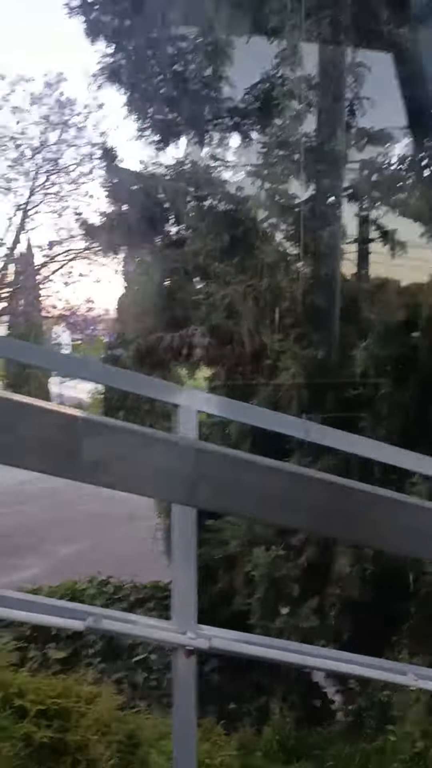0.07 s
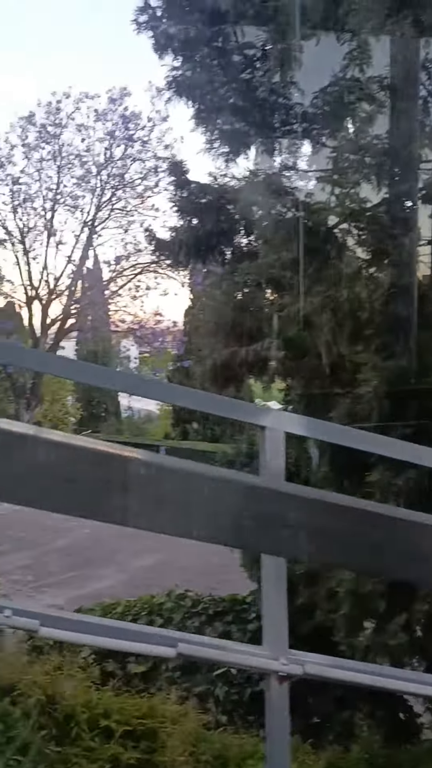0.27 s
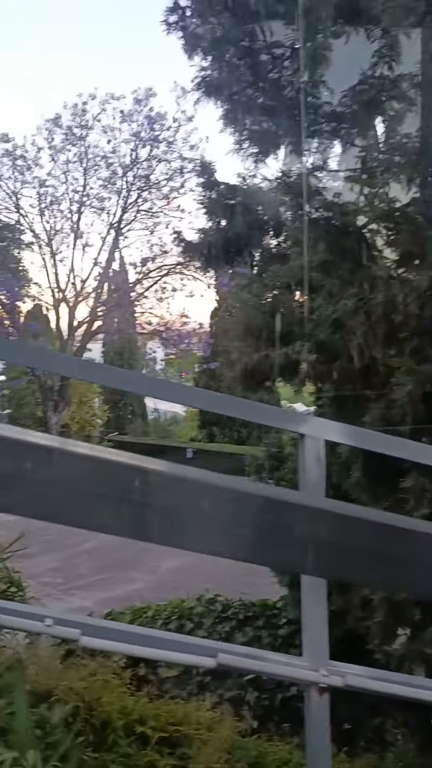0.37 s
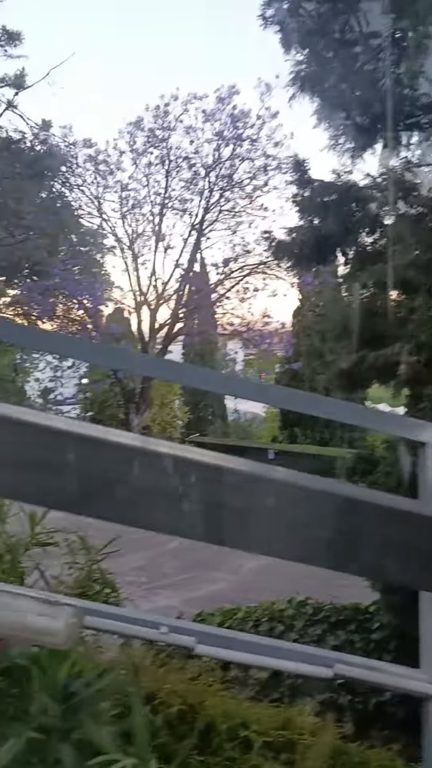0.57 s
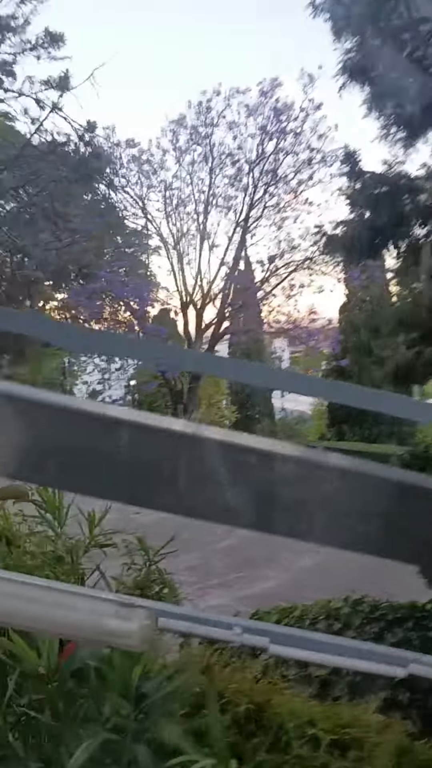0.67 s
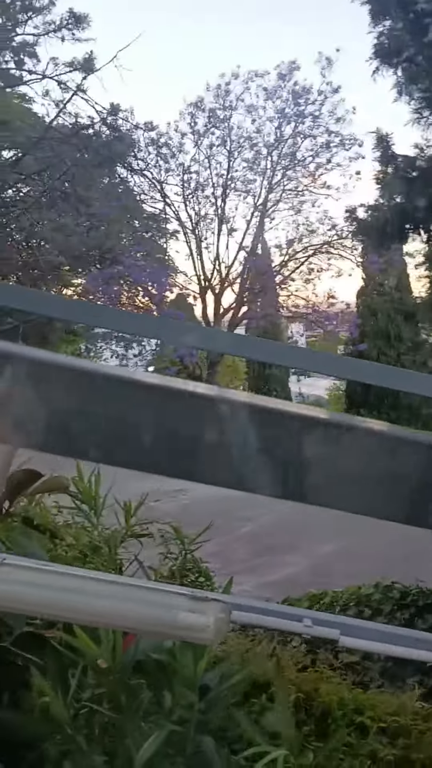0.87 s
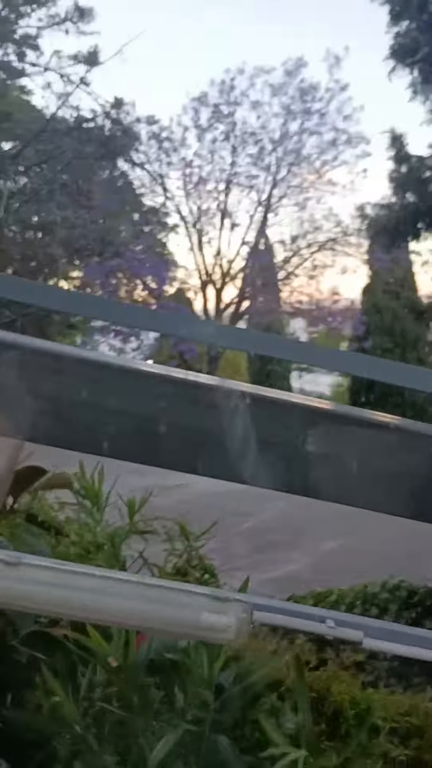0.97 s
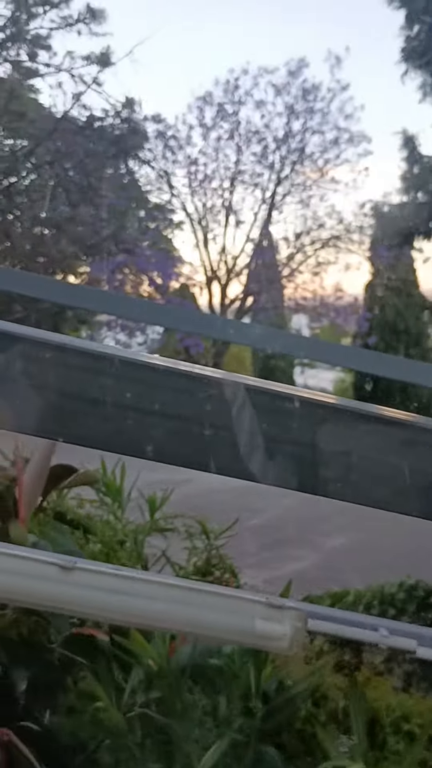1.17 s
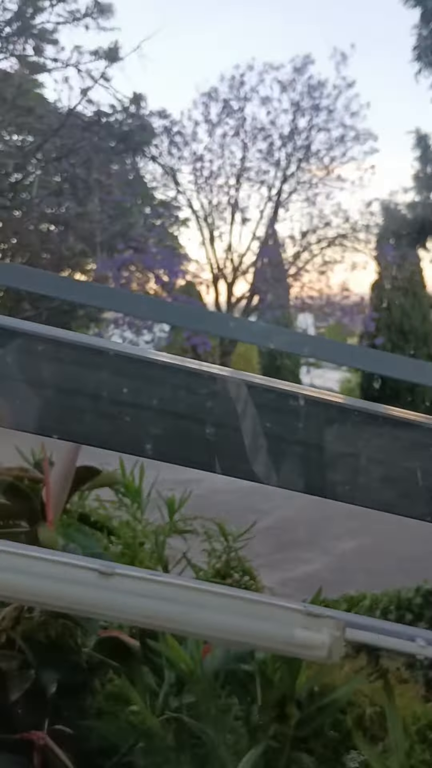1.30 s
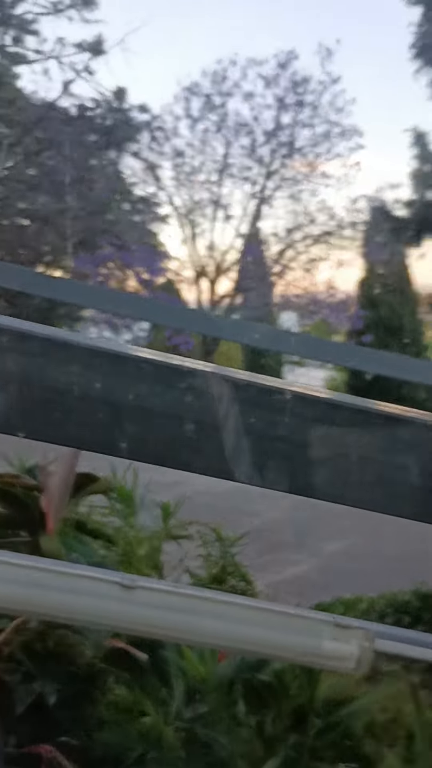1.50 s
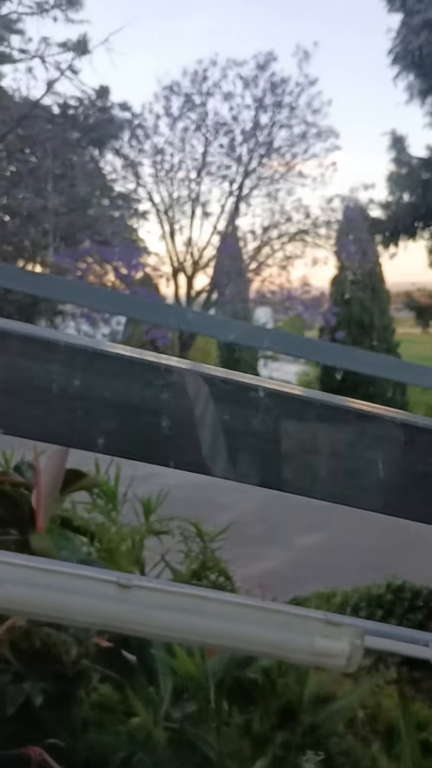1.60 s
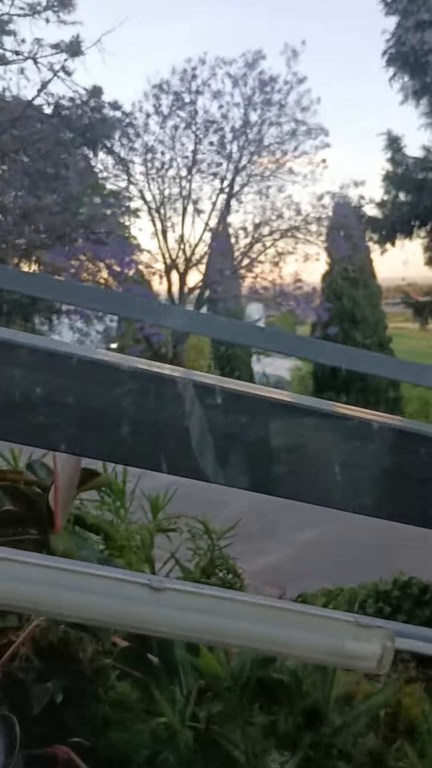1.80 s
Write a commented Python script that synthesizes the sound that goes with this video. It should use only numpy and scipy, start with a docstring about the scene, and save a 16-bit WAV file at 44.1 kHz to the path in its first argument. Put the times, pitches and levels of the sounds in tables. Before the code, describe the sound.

One sharp, bright metal clack with quick chattering rebounds rings briefly in a small hard funicular cabin, followed by scattered light ticks over quiet wheel rumble and thin hiss, picked up close by a handheld microphone inside.

```python
"""Wheels rumble and a thin hiss runs on, from filtered noise, while loose parts of a funicular cabin tick.
The body groans faintly twice, once near the start and once well after a metal fitting slams and chatters:
sliding tones with rough noise. The slam is one sharp clack of close contacts that rings fitting and panel.
Wheel bumps boom as low noise bursts. Each knock is a short crack plus a bright tail of echoes from the
small, hard cabin."""
import sys
import numpy as np
from scipy import signal
from scipy.fft import rfft, irfft, next_fast_len
from scipy.io import wavfile
from scipy.ndimage import uniform_filter1d

SR = 44100
rng = np.random.default_rng(int(sys.argv[2]) if len(sys.argv) > 2 else 0)


def transcribe(signal):
    """Save signal, clipped to [-1, 1], as a 16-bit WAV file at the path in sys.argv[1]."""
    frames = np.atleast_2d(signal).T
    limited = np.clip(frames, -1, 1)
    pcm = np.round(limited * 32767).astype(np.int16)
    wavfile.write(sys.argv[1], SR, pcm)


N = 81585  # length in samples


def undb(db):
    """Turn decibels into an amplitude factor."""
    return 10 ** (np.asarray(db) / 20)


def unit(x):
    """Scale to an energy of 1."""
    return x / np.sqrt(np.sum(x ** 2))


def along(points, hz):
    """Read a value between (Hz, value) points, on a log-frequency axis."""
    point_hz, values = np.array(points, float).T
    return np.interp(np.log(hz + 1), np.log(point_hz), values)


def colour(x, points):
    """Filter to the given (Hz, dB) response; folding the cepstrum forward keeps sound from coming early."""
    n = 2 * next_fast_len(len(x))
    hz = np.arange(n // 2 + 1) * SR / n
    cepstrum = irfft(np.log(undb(along(points, hz))))
    cepstrum[1:n // 2] *= 2
    cepstrum[n // 2 + 1:] = 0
    response = np.exp(rfft(cepstrum))
    return irfft(rfft(x, n) * response)[:len(x)]


def resonate(x, hz, width_hz):
    """One resonance: the narrower it is, the longer it rings."""
    b, a = signal.iirpeak(min(hz, SR / 2 - 1000), hz / width_hz, fs=SR)
    return signal.lfilter(b, a, x)


def noise(points):
    """Steady coloured noise, rms 1."""
    return unit(colour(rng.standard_normal(N), points)) * np.sqrt(N)


def walk(rate):
    """Smooth random wandering with a spread of 1, heading for a new value `rate` times a second."""
    k = int(SR / rate)
    steps = np.repeat(rng.standard_normal(N // k + 1), k)
    smooth = uniform_filter1d(steps, k)[:N]
    return smooth / smooth.std()


def add(out, start, x):
    """Mix x in at a time in seconds."""
    i = int(start * SR)
    out[i:i + len(x)] += x[:N - i]


UNEVEN_DB, UNEVEN_STEP_HZ = 3, 110


def uneven(x):
    """The many weak resonances of a part lift some narrow bands and sink others."""
    hz = np.arange(900, SR / 2, UNEVEN_STEP_HZ)
    db = UNEVEN_DB * np.clip(rng.standard_normal(len(hz)), -2, 1)
    return colour(x, [(700, 0), *zip(hz, db)])


CABIN_BUILD_S = 0.0045  # how gradually the echoes build up
# How long cabin echoes take to fall by 60 dB, before any shortening: f/Hz, t/s
CABIN_ECHO_TIMES = [(300, 0.39), (1200, 0.14), (3500, 0.23), (6000, 0.17), (9000, 0.15)]


def knock(crack_db, crack_s, tail_share=1):
    """A brief crack and the dense echoes of the cabin, each band dying at its own rate."""
    t = np.arange(SR // 2) / SR
    crack, echoes = rng.standard_normal((2, len(t)))
    spectrum = rfft(echoes)
    # half-octave bands, numbered
    band = np.round(2 * np.log2(np.arange(len(spectrum)) * SR / len(t) + 100))
    tail = np.zeros(len(t))
    for b in np.unique(band):
        t60 = tail_share * along(CABIN_ECHO_TIMES, 2 ** (b / 2))
        tail += irfft(spectrum * (band == b), len(t)) * np.exp(-np.log(1000) * t / t60)
    tail = unit(tail * (1 - np.exp(-t / CABIN_BUILD_S)))
    return tail + undb(crack_db) * unit(crack * np.exp(-t / crack_s))


# crack over the tail, and its fade time, for the clack and the jiggle
CRACK_DB, CRACK_S = -1.5, 0.0026
TICK_TAIL_SHARE = 0.74  # loose parts get echoes of this share of the full length
JIGGLE_DB, JIGGLE_PER_S = -7, 35  # level against the hiss, mean contacts a second
HISS_FLICKER_DB = 1.5  # spread of the flicker
# Colour of the hiss and the jiggling trim: f/Hz, level/dB
HISS_COLOUR = [(200, -15.5), (600, 2.5), (1200, 3.5), (2500, 1.5), (6300, 3), (8000, -8.5), (10000, -21),
               (13000, -24.5), (15500, -16)]


def jiggle():
    """Fine chance contacts of loose trim, rms 1."""
    contacts = (rng.random(N) < JIGGLE_PER_S / SR) * rng.random(N)
    knocks = signal.fftconvolve(contacts, knock(CRACK_DB, CRACK_S, TICK_TAIL_SHARE))[:N]
    return np.sqrt(N) * unit(colour(knocks, HISS_COLOUR))


# Colour of the wheel rumble: f/Hz, level/dB
RUMBLE_COLOUR = [(45, -20), (68, 0), (110, 1), (160, 1.5), (240, -6.5), (420, -8.5), (700, -21),
                 (1500, -23.5), (5000, -57)]
# How loud the running noise is over time: t/s, rumble level/dB, hiss level/dB
RUNNING_LEVELS = [(0, -59, -63.5), (0.182, -67.5, -69), (0.45, -63, -70), (0.68, -66, -63.5),
                  (0.799, -67, -69), (1.12, -60.5, -66.5), (1.42, -61.5, -64.5), (1.57, -64.5, -66.5),
                  (1.68, -61, -63.5), (1.85, -63.5, -69.5)]


def running():
    """Wheel rumble and a flickering rolling hiss; the jiggling trim follows the hiss level over time."""
    t = np.arange(N) / SR
    times, rumble_db, hiss_db = np.array(RUNNING_LEVELS).T
    rumble = undb(np.interp(t, times, rumble_db)) * noise(RUMBLE_COLOUR)
    flicker = undb(HISS_FLICKER_DB * walk(49.95))
    rolling = flicker * noise(HISS_COLOUR) + undb(JIGGLE_DB) * jiggle()
    return rumble + undb(np.interp(t, times, hiss_db)) * rolling


TICK_DB, TICK_CRACK_S = 0.5, 0.0028  # added to every tick's level; fade time of its crack
TICK_WIDTH_HZ, TICK_MODE_STEP_DB = 224, -2.25  # each next resonance is weaker by this step
SHEEN_HZ, SHEEN_WIDTH_HZ = 15700, 2400
# Colour of the broad click: f/Hz, level/dB
TICK_COLOUR = [(200, -2.5), (700, -18), (1200, -0.5), (2200, -2.5), (4000, 5), (6200, 6.5), (8000, -12),
               (10000, -25.5), (15000, -45.5)]
# Knocks of loose parts: t/s, level/dB, crack level over the tail/dB, click level against the
# resonances/dB, top-end sheen level/dB, resonances f/Hz (strongest first)
LOOSE_PARTS = [(0.0090, -28, -2, -26, -32, (970, 2200)),
               (0.0367, -19.5, -2.5, -4, -19, (6530, 7930, 9260, 1740)),
               (0.0497, -17, -8, -34, -25, (6450, 7100, 3070, 3530, 1800)),
               (0.1316, -32, 2, 2, -32, (4700,)), (0.2094, -18.5, -25, -3, -19, (2900,)),
               (0.4339, -14, -3, -3, -36, (5930, 5000, 2730, 3790, 1620, 1980, 1280)),
               (0.4971, -25.5, -5, 14, -38, (4000, 2800)),
               (0.5418, -23, -2, -3, -48, (7020, 3950, 7040, 2770)), (0.596, -25.5, -4, -2, -28, (6700,)),
               (0.606, -19.5, -12, 1, -26, (4730, 6350, 4770, 2180)),
               (0.693, -18.5, -2.5, -4.5, -15, (5790, 5100, 2100, 6870, 4170)),
               (0.725, -22.5, -3, 5.5, -24, (1970, 5000, 3430)), (0.8282, -29, -3, 14, -19, (5500,)),
               (0.8626, -17, -9, -22, -52, (4175, 4820, 4460, 3920, 2270)),
               (0.88, -27.5, 5, -5.5, -37, (4500,)), (1.3785, -27, -0.5, 4, -26, (6900, 1090)),
               (1.4830, -28, 4, 2.5, -34, (3570, 1080)), (1.5150, -31.5, -4, 7, -32, (4260,)),
               (1.609, -22.5, -5, 1.5, -34, (5800, 4700)), (1.6701, -24.5, -2.5, 1, -18, (5600, 1650)),
               (1.7374, -15, 1, -4, -41, (4840, 3740, 4640, 6150, 7760, 9120)),
               (1.764, -26.5, -15, 2, -34, (1650,)), (1.8303, -34, -13, 8, -10, (8800,))]


def ticks():
    """Each loose part gives a broad click and a few resonances of its own; the microphone adds a sheen."""
    out = np.zeros(N)
    for start, db, crack_db, click_db, sheen_db, resonances in LOOSE_PARTS:
        hit = knock(crack_db, TICK_CRACK_S, TICK_TAIL_SHARE)
        click = unit(colour(uneven(hit), TICK_COLOUR))
        ring = np.zeros(len(hit))
        for k, hz in enumerate(resonances):
            narrow = resonate(hit, hz, TICK_WIDTH_HZ)
            ring += undb(k * TICK_MODE_STEP_DB) * unit(resonate(narrow, hz, 4 * TICK_WIDTH_HZ))
        body = unit(unit(ring) + undb(click_db) * click)
        sheen = resonate(hit, SHEEN_HZ, SHEEN_WIDTH_HZ)
        sheen = unit(resonate(sheen, SHEEN_HZ, SHEEN_WIDTH_HZ))
        add(out, start, undb(TICK_DB + db) * (body + undb(sheen_db) * sheen))
    return out


GROAN_SETTLE_S, GROAN_ATTACK_S, GROAN_RELEASE_S = 0.0183, 0.019, 0.059
GROAN_ROUGH_DB = -4  # rubbing noise against the tone
GROAN_UPPER, GROAN_UPPER_DB = 1.1, -20  # upper mode: pitch ratio and level
# Groans of the body: t/s, length t/s (before half a release is added), start f/Hz, settled f/Hz, level/dB
GROANS = [(0.009, 0.12, 418, 327, -54), (1.061, 0.093, 383.4, 445.4, -56)]


def groans():
    """Short rubbing tones of the cabin body that slide and settle, with a weaker upper mode."""
    out = np.zeros(N)
    for start, length, from_hz, to_hz, db in GROANS:
        t = np.arange(int((length + GROAN_RELEASE_S / 2) * SR)) / SR
        pitch_hz = to_hz + (from_hz - to_hz) * np.exp(-t / GROAN_SETTLE_S)
        phase = 2 * np.pi * np.cumsum(pitch_hz) / SR
        tone = np.sqrt(2) * (np.sin(phase) + undb(GROAN_UPPER_DB) * np.sin(GROAN_UPPER * phase))
        rub = resonate(resonate(rng.standard_normal(N), to_hz, 210), to_hz, 210)
        rub = unit(rub)[:len(t)] * np.sqrt(N)
        fade_in = np.minimum(t / GROAN_ATTACK_S, 1)
        fade_out = np.minimum((t[-1] - t) / GROAN_RELEASE_S, 1)
        add(out, start, undb(db) * fade_in * fade_out * (tone + undb(GROAN_ROUGH_DB) * rub))
    return out


CONTACT_HZ = 19000  # brightness limit of a 0 dB contact


def soften(x, db):
    """A lighter contact lasts longer and so is duller: a low-pass that drops with level."""
    cutoff_hz = min(CONTACT_HZ * undb(db / 2), SR / 2 - 1000)
    return signal.lfilter(*signal.butter(2, cutoff_hz, fs=SR), x)


def fed(blows, t60):
    """Amplitude of a ring whose energy is fed by blows and leaks away."""
    keep = np.exp(-2 * np.log(1000) / (t60 * SR))
    return np.sqrt(signal.lfilter([1], [1, -keep], blows))


RING_WAVER_RAD = 0.6  # spread of the phase waver


def mode(hz):
    """One wavering partial; its pitch may move."""
    turns = np.cumsum(hz * np.ones(N)) / SR + rng.random()
    return np.sin(2 * np.pi * turns + RING_WAVER_RAD * walk(62.4))


CLACK_DB = 11  # lifts the whole clack
RATTLE_DB, RATTLE_PER_S = 1.5, 350  # spread and rate of the rattle's level
RING_DB, RING_T60_S, RING_BUILD_S = -7.5, .23, 0.01  # fitting's level against the rattle; decay; build-up
PANEL_DB, PANEL_T60_S, PANEL_SAG_HZ_PER_S = -19.5, .26, 160.5  # panel's level, decay and falling pitch
# Contacts of the clack: t/s, level/dB (against one another)
CONTACTS = [(0.2213, 1), (0.224, 1), (0.2346, -5.5), (0.246, -6), (0.2551, -4), (0.262, -11.5),
            (0.2686, -11), (0.278, -11.5)]
# Colour of the clack: f/Hz, level/dB
CLACK_COLOUR = [(150, -45.5), (450, -39.5), (560, -16.5), (700, -19.5), (830, -18.5), (1100, -18),
                (1900, -10), (2250, -15), (2700, -8.5), (4000, -6.5), (5700, 0.5), (7400, -7.5),
                (9000, -19), (13000, -32.5), (15500, -18)]
# Modes of the fitting, whose levels follow the colour of the clack: f/Hz
FITTING_MODES = [1852, 2449, 2740, 3233, 3345, 3569, 3945, 4071, 4480, 4610, 4885, 4991, 5221, 5935, 6027,
                 6506]
# Modes of the panel that holds the fitting: f/Hz (before it sags), level/dB (against one another)
PANEL_MODES = [(545, -4.5), (606, 0), (680, -7.5)]


def clack():
    """The fitting hits, rebounds and chatters; contacts feed its modes and the sagging, beating panel."""
    knocks, blows, t = np.zeros(N), np.zeros(N), np.arange(N) / SR
    for start, db in CONTACTS:
        add(knocks, start, undb(db) * soften(knock(CRACK_DB, CRACK_S), db))
        # energy goes with amplitude squared
        add(blows, start, undb(db) ** 2 * signal.windows.hann(int(RING_BUILD_S * SR)))
    rattle = colour(uneven(knocks * undb(RATTLE_DB * walk(RATTLE_PER_S))), CLACK_COLOUR)
    partials = sum(undb(along(CLACK_COLOUR, hz)) * mode(hz) for hz in FITTING_MODES)
    ring = fed(blows, RING_T60_S) * partials
    sag_hz = PANEL_SAG_HZ_PER_S * np.maximum(t - CONTACTS[0][0], 0)
    panel_partials = sum(undb(db) * mode(hz - sag_hz) for hz, db in PANEL_MODES)
    # light later contacts count for more in the panel than in the fitting, so its ring is kept up longer
    panel = fed(np.sqrt(blows), PANEL_T60_S) * panel_partials
    return undb(CLACK_DB) * (unit(rattle) + undb(RING_DB) * unit(ring) + undb(PANEL_DB) * unit(panel))


# Wheel bumps through the floor: t/s, length t/s, f/Hz, level/dB
WHEEL_BUMPS = [(0.403, 0.051, 200, -55), (0.826, 0.041, 298, -63.5), (1.433, 0.042, 139.6, -55),
               (1.606, 0.052, 134, -54.5), (1.646, 0.04, 336, -66), (1.730, 0.067, 126, -59),
               (1.822, 0.045, 143, -58)]


def bumps():
    """Uneven rail makes the floor boom for a few cycles: short bursts of low, narrow noise."""
    out = np.zeros(N)
    for start, length, hz, db in WHEEL_BUMPS:
        n = int(length * SR)
        boom = resonate(resonate(rng.standard_normal(N), hz, hz / 2), hz, hz / 2)[-n:]
        burst = unit(boom * signal.windows.tukey(n, .6))
        add(out, start, undb(db) * np.sqrt(n) * burst)
    return out


def scene():
    """All the sounds of the cabin together, as one channel."""
    return (running() + ticks() + groans() + clack() + bumps())[None]


TOP_HZ = 15900


def record(dry):
    """The recorder cuts the top: a steep low-pass at TOP_HZ."""
    return signal.sosfilt(signal.ellip(10, .2, 70, TOP_HZ, fs=SR, output="sos"), dry)


dry = scene()
out = record(dry)
transcribe(out)
```